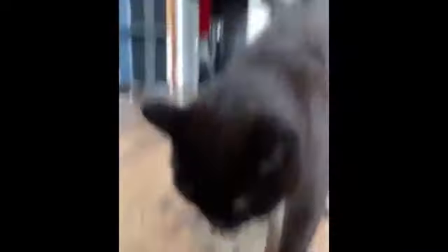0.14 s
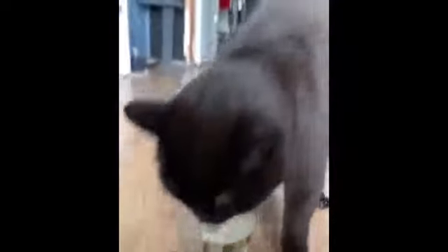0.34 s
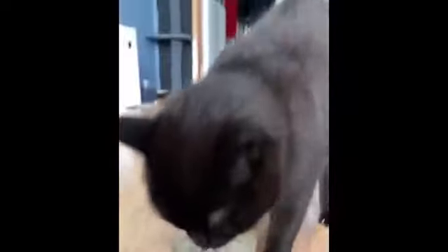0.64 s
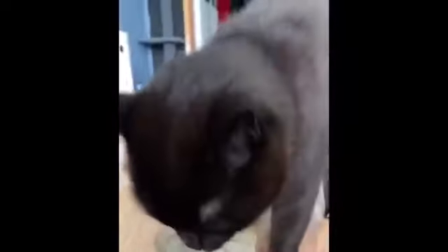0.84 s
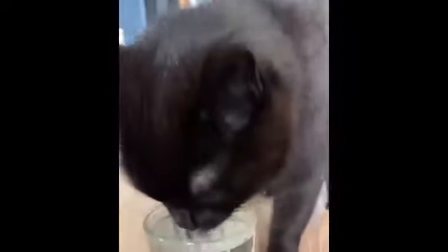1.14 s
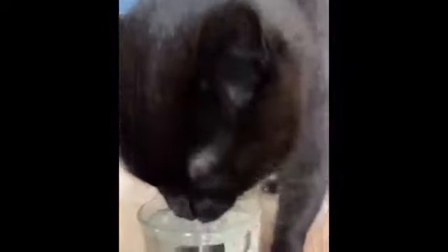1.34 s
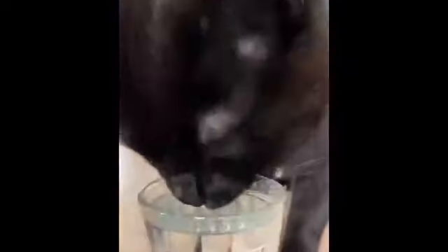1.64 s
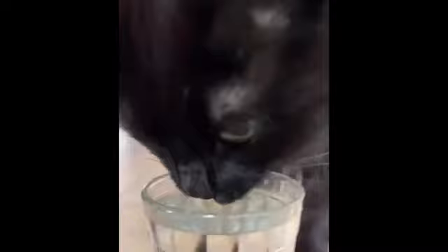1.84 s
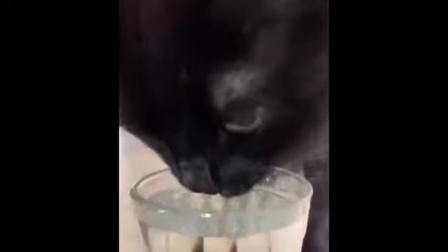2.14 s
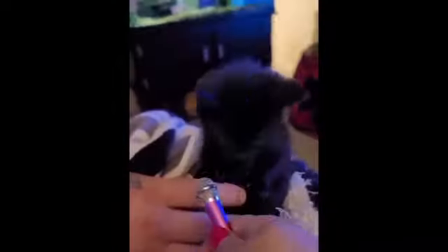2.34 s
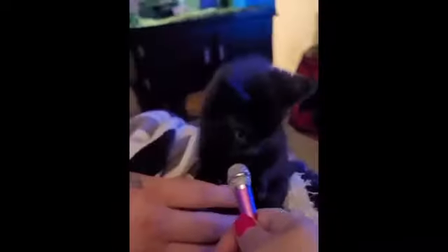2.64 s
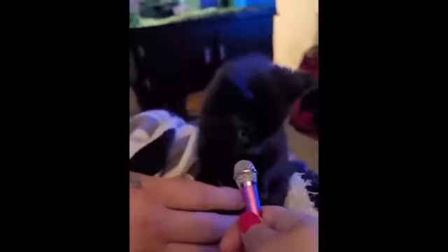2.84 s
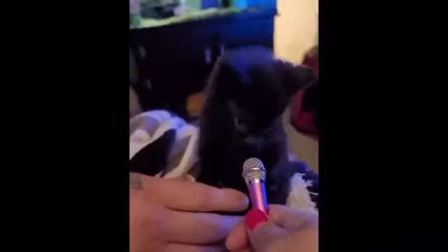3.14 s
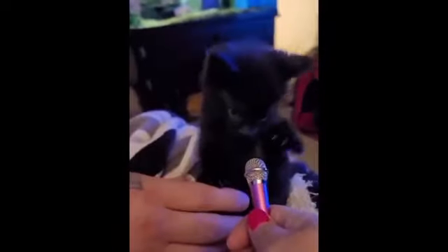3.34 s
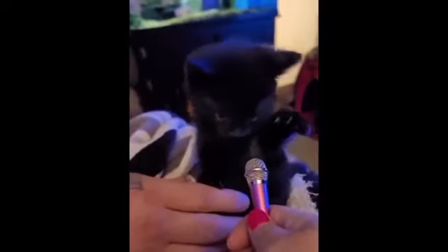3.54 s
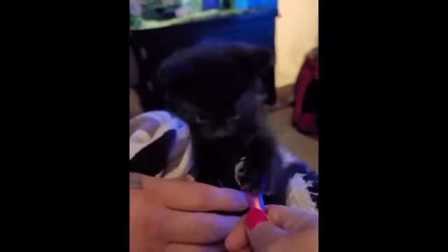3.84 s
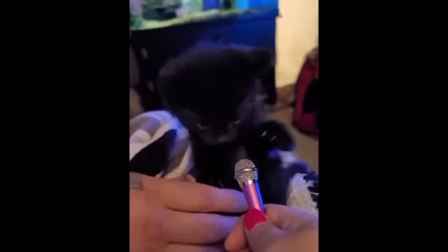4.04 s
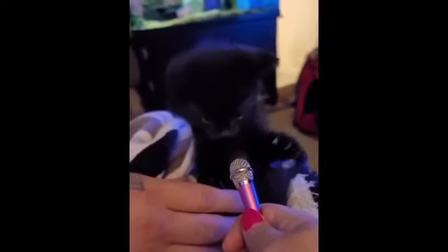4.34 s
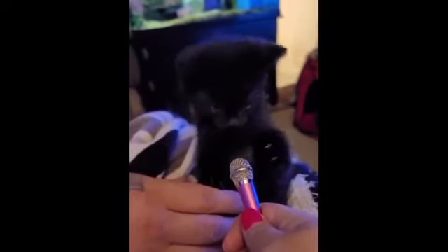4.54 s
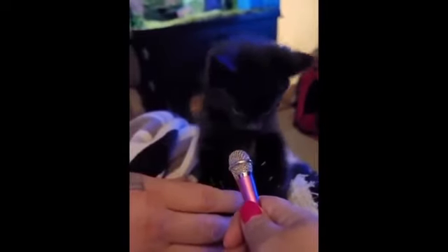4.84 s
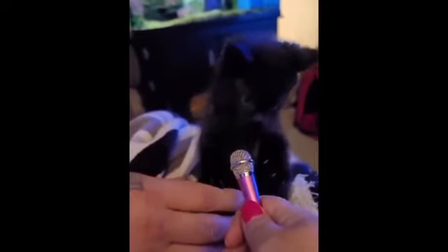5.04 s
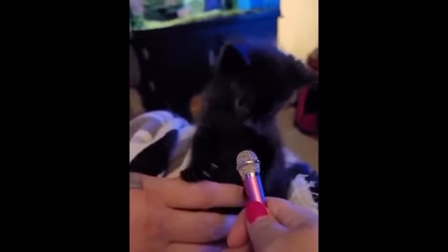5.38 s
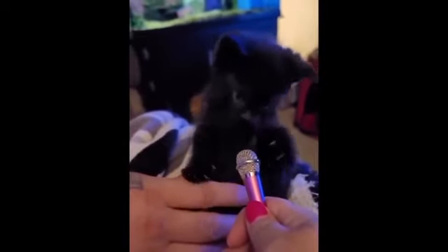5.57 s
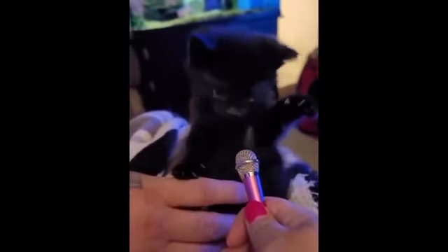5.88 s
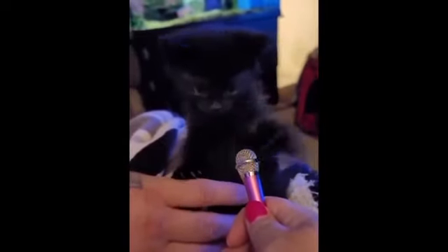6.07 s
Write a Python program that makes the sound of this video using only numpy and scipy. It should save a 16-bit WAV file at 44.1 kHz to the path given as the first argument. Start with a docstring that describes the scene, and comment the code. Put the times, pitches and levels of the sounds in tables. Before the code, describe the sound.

Indoors with a hard floor, hollow water pops and faint wet ticks come from a cat drinking, its breath hissing through the nose against motor hum that swells slightly. The sound cuts to brief silence, then a hushed room with low mains hum. Against the microphone come grainy fur rustles, whisker snaps, bassy paw bumps, a fluttering low purr, and a hard clatter of claws.

```python
"""Cat at a glass, kitten at a microphone

Close at a glass in a room of humming appliances, a cat laps: ringing air pockets click, nose noise puffs.
After a short silence, in a quieter room, a kitten plays with a tiny hand-held microphone:
noise and small flicks ring the grille as fur, soft pushes thump the capsule as paws, claws tick on
the mesh, and a soft purr is a train of throat pulses ringing chest and throat. Both ears hear the same."""
import sys
import numpy as np
from scipy import signal
from scipy.fft import rfft, irfft, next_fast_len
from scipy.io import wavfile
from scipy.ndimage import uniform_filter1d

SR = 44100
rng = np.random.default_rng(int(sys.argv[2]) if len(sys.argv) > 2 else 0)


def to_wav(s):
    """Save 16-bit WAV."""
    ch = np.atleast_2d(s).T  # columns
    pcm = np.round(np.clip(ch, -1, 1) * 32767)  # PCM
    wavfile.write(sys.argv[1], SR, pcm.astype(np.int16))


N = 273861
TIME = np.arange(N) / SR
HIT_TIME = np.arange(SR // 5) / SR  # time within one short sound, s


# tongue slapping the water: start_s, peak_db (of the lowest mode), crackle_s, pitch_hz, tilt_db_per_octave
SLAPS = [(1.4395, -18, .005, 1350, -5), (1.69, -22, .007, 1050, -1), (1.7189, -10, 0.001, 1240, 2)]
# hollow between tongue, water and glass: pitch_ratio, sharpness_q, level_db (before the tilt)
HOLLOW = [(1, 2.5, 0), (1.9, 3, -10), (2.8, 3, -10)]
# air pockets popping as the tongue lifts: start_s, peak_db, pitch_hz, crackle_s, sharpness_q
POCKETS = [(.267, -35.5, 3870, 0.0033, 8), (.302, -23, 2230, 0.011, 8), (.323, -26, 2140, 0.016, 5.5),
           (.361, -27.5, 2100, 0.017, 5.5), (0.451, -28.5, 2620, 0.0032, 5.9),
           (.485, -29, 2190, 0.016, 3.3), (.596, -29.5, 1670, 0.0078, 12), (.667, -37, 4070, 0.0054, 8),
           (0.773, -27.5, 2600, 0.008, 2.7), (0.909, -21, 2800, 0.0046, 6.2),
           (.965, -30, 2970, 0.0065, 2.8), (1.056, -40.5, 6000, .003, 9), (1.072, -29.5, 2680, .004, 16),
           (1.127, -36, 6260, .003, 9.3), (1.162, -33, 2770, .006, 2.7), (1.269, -35, 2900, .004, 7),
           (1.396, -29.5, 5330, .003, 12), (1.517, -31.5, 2930, 0.0077, 7), (1.593, -34.5, 2630, .008, 5.9),
           (1.78, -26.5, 3030, .0019, 4.3), (1.859, -32, 2420, .005, 7), (1.9397, -19.5, 2700, 0.0028, 3.1),
           (1.947, -26.5, 2400, 0.0049, 2.3), (1.955, -19.5, 3050, .004, 6.2)]
# faint wet ticks between them, at random around one size and pitch
TICKS_PER_S = 22
TICK_DB, TICK_SPREAD_DB, TICK_DB_PER_OCTAVE = -35, 1, -5
TICK_HZ, TICK_SPREAD_OCTAVES = 2400, 0.25
TICK_LENGTH_S, TICK_Q = 0.004, 5
# droplets thrown by each slap
DROPLET_COUNT, DROPLET_DELAY_S = 4, 0.012
DROPLET_DB, DROPLET_HZ, DROPLET_SPREAD_OCTAVES = -33, 2500, 0.45
FIRST_END_S = 2.168


def lapping():
    """Tongue slaps ring the hollow under it and throw droplets; air pockets pop, with faint ticks between."""
    out = np.zeros(N)
    for s, db, length, hz, tilt_db in SLAPS:
        for ratio, q, mode_db in HOLLOW:
            level_db = db + mode_db + tilt_db * np.log2(ratio)
            add(out, s, pocket(level_db, hz * ratio, length, q))
        for delay, size, pitch in rng.standard_normal((DROPLET_COUNT, 3)):
            drop_hz = DROPLET_HZ * 2 ** (DROPLET_SPREAD_OCTAVES * pitch)
            drop = pocket(DROPLET_DB + 2 * size, drop_hz, TICK_LENGTH_S, TICK_Q)
            add(out, s + length + DROPLET_DELAY_S * abs(delay), drop)

    for s, db, hz, length, q in POCKETS:
        add(out, s, pocket(db, hz, length, q))

    for k in range(int(FIRST_END_S * TICKS_PER_S)):
        size, pitch = rng.standard_normal(2)
        octaves = TICK_SPREAD_OCTAVES * pitch
        tick_db = TICK_DB + TICK_SPREAD_DB * size + TICK_DB_PER_OCTAVE * octaves
        tick = pocket(tick_db, TICK_HZ * 2 ** octaves, TICK_LENGTH_S, TICK_Q)
        add(out, (k + rng.random()) / TICKS_PER_S, tick)

    # the hard floor and walls return a short tail, falling 60 dB in 0.36 s
    tail = unit(rng.standard_normal(len(HIT_TIME)) * undb(-60 * HIT_TIME / 0.36))
    tail = tail / np.sqrt(len(tail))
    return out + undb(-11.0) * signal.fftconvolve(out, tail)[:N]


def pocket(db, hz, length, q):
    """A small air pocket pops, and the wet crackle after it rings the same cavity."""
    t = HIT_TIME
    ring_s = q / (2 * hz)
    onset = (1 - np.exp(-t / (0.18 * length))) ** 2
    pop = np.sin(2 * np.pi * hz * t) * np.exp(-t / ring_s) * onset
    wet = crackle(len(t), spread_db=2.0) * np.sqrt(t) * np.exp(-(t / length) ** 2 / 2)
    wet = resonate(resonate(wet, hz, q), hz, q / 2)
    return peak(peak(pop, 0) + peak(wet, 0), db)


# puffs through the cat's nose: crest_s, level_db, half_width_s (to 1/e of the power)
PUFFS = [(.15, -44, 0.11), (.585, -39.5, 0.081), (1.31, -49, 0.088), (1.72, -37.5, 0.064),
         (2.06, -42.5, 0.057)]
# hiss of the nose: pitch_hz, density_db (per Hz, relative)
NOSE_COLOUR = [(500, -4.5), (1500, 0.5), (3000, 3), (4500, -0.5), (6200, 0), (8500, -4), (10500, -8),
               (12000, -23)]
NOSE_STEADY_DB = -51  # the flow between puffs


def nose():
    """Turbulent breath hisses over the glass in short puffs, each swelling and fading evenly."""
    power = undb(NOSE_STEADY_DB) ** 2
    for s, db, width in PUFFS:
        power = power + undb(db) ** 2 * np.exp(-((TIME - s) / width) ** 2)
    hiss = colour(rng.standard_normal(N), NOSE_COLOUR)
    return hiss * np.sqrt(power) * undb(1.0 * walk(30.07))


# strokes of fur over the grille: start_s, length_s, level_db (before grip and hairs)
STROKES = [(2.488, 0.076, -54.5), (2.774, 0.023, -36.5), (2.823, 0.008, -44), (2.923, 0.082, -45),
           (3.256, 0.043, -43.5), (3.341, 0.025, -44.5), (3.371, 0.13, -42.5), (3.668, 0.012, -49.5),
           (3.772, 0.014, -57)]
STROKE_ATTACK_S, STROKE_RELEASE_S = 0.0086, 0.04
STROKE_CATCH_DB, STROKE_CATCH_S = -21, 0.0058  # extra pressure as hairs catch, then slide
# whiskers catching on the mesh: start_s, scrape_db (before the ring and rustle shares), length_s, snap_peak_db
SCRAPES = [(2.7765, -39, 0.014, -33), (2.8007, -34, .0035, -20), (2.809, -39, 0.0068, -28),
           (2.834, -34, 0.012, -21), (2.921, -40, 0.005, -27), (2.942, -48, .004, -34),
           (2.957, -48, .005, -34), (3.252, -34, 0.012, -26), (3.285, -38, .007, -29),
           (3.34, -37.5, 0.0061, -28), (3.371, -44, .007, -35), (3.463, -40, 0.0049, -27),
           (3.51, -35, 0.0045, -24)]
# rustle of fur: pitch_hz, density_db (per Hz, relative)
FUR_COLOUR = [(350, 12), (600, -1.5), (800, -12), (1300, -7), (1900, -12), (2400, 0.5), (3500, -0.5),
              (5000, -7), (6400, -8), (7500, -6), (10000, -12.5), (12000, -28)]
# resonances of the grille, each set off by its own hairs: pitch_hz, sharpness_q, level_db (relative)
GRILLE = [(723, 5, 5), (988, 11, 7), (1247, 19, 5.5), (1550, 7.9, 5), (1917, 20, 4), (2950, 2.1, -1),
          (4180, 6.1, -1), (5700, 6.8, 3), (6400, 50, -1.5)]
WHISKER_RING_DB, WHISKER_RUSTLE_DB = -6.5, -15  # a stiff whisker rings the grille more than it rustles
# single hairs flicking off the wire; their level is relative to the rustle
HAIRS_PER_S, HAIR_SPREAD_DB, HAIR_MODE_SPREAD_DB, HAIR_DB = 300, 4, 3, 2


def fur():
    """Hairs slip over the grille in a grainy rustle; now and then a whisker catches, snaps free and scrapes."""
    pressure, catches, snaps = np.zeros(N), np.zeros(N), np.zeros(N)
    for s, length, db in STROKES:
        add(pressure, s, undb(db) * stroke(length))

    flick = np.exp(-HIT_TIME / 0.00018)
    ping = sum(undb(db) * resonate(flick, hz, q) for hz, q, db in GRILLE)
    for s, db, length, snap_db in SCRAPES:
        add(catches, s, undb(db) * np.exp(-HIT_TIME / length))
        add(snaps, s, peak(ping, snap_db))

    rustle = colour(crackle(N, spread_db=3.0), FUR_COLOUR)
    rings = np.zeros(N)
    for hz, q, db in GRILLE:
        # the force jumps every 150 samples as hairs slip
        slips = undb(4.5 * np.repeat(rng.standard_normal(N // 150 + 1), 150)[:N])
        driven = resonate(crackle(N, spread_db=5.0) * slips, hz, q)
        rings += undb(db) * unit(resonate(driven, hz, q=2.2))
    rings = unit(rings)

    grip_db = 2 * np.interp(TIME * 140, np.arange(1024), rng.standard_normal(1024))
    grip = unit(undb(grip_db))
    texture = unit(unit(rustle + rings) + undb(HAIR_DB) * hairs())
    sliding = pressure * grip * texture
    scraping = catches * (undb(WHISKER_RING_DB) * rings + undb(WHISKER_RUSTLE_DB) * rustle)
    return sliding + snaps + scraping


def stroke(length):
    """Pressure of one stroke: the hairs catch, slide on and lift off."""
    t = TIME[:SR // 2]
    attack = np.minimum(t / STROKE_ATTACK_S, 1)
    catch = 1 + undb(STROKE_CATCH_DB) * np.exp(-t / STROKE_CATCH_S)
    lift = np.exp(-np.maximum(t - length, 0) / STROKE_RELEASE_S)
    return attack * catch * lift


def hairs():
    """Single hairs flick off the wire, each ringing the grille in its own way."""
    count = int(N / SR * HAIRS_PER_S)
    at = rng.integers(0, N, count)
    size_db = HAIR_SPREAD_DB * np.clip(rng.standard_normal(count), -2, 2)
    out = np.zeros(N)
    for hz, q, db in GRILLE:
        strength = undb(size_db + HAIR_MODE_SPREAD_DB * rng.standard_normal(count))
        flicks = np.bincount(at, strength * rng.choice([-1, 1], count), N)
        out += undb(db) * unit(resonate(resonate(flicks, hz, q), hz, q=2.3))
    return unit(out)


# paw blows on the microphone: start_s, peak_db, contact_s (time scale of the push), swing_hz
PAWS = [(2.838, -33, 0.0011, 85), (3.653, -2.5, 0.00052, 77.4), (3.785, -26.5, 0.00062, 80),
        (4.618, -15, 0.00051, 86), (4.652, -17, 0.00048, 90), (5.94, -4, 0.0011, 70)]
BODY_HZ, BODY_Q, BODY_DB = 784, 6.2, -12.5  # the microphone's housing knocks under a blow


def paws():
    """A soft pad pushes the capsule; the microphone's bass cut swings it back in a thump, the housing knocks."""
    push = np.zeros(N)
    t = HIT_TIME - 0.01  # the push crests at zero
    for s, db, contact, hz in PAWS:
        pad = 1 / np.cosh(np.clip(t / contact * 0.89, -50, 50))
        swing = resonate(resonate(pad, hz, q=1.26, kind="high"), 48, q=1.0, kind="high")
        knock = undb(BODY_DB) * BODY_Q * resonate(pad, BODY_HZ, BODY_Q)
        add(push, s + t[0], peak(swing + knock, db))
    return -push


# claws on the mesh: start_s, peak_db, mesh_share (0-1)
CLAWS = [(4.6173, -21, 0.01), (4.6527, -28, 0.01), (5.935, -23, 0.8), (5.9401, -2.5, 0.3),
         (5.9429, -11, 0.7), (5.953, -14, 0.4), (5.956, -19, 0.2), (5.9596, -9.5, 0.17), (5.962, -14.5, 0),
         (5.969, -18.5, 0)]


def claws():
    """A claw gives a hard, gritty tick; the wire mesh rings briefly and sizzles on."""
    out, t = np.zeros(N), HIT_TIME
    for s, db, mesh_share in CLAWS:
        tick = resonate(np.exp(-t / 0.001), 4600, q=1.0, kind="low")
        grit = resonate(rng.standard_normal(len(t)), 4600, q=1.0, kind="low") * np.exp(-t / 0.005)
        mesh_hz = 6400 * (1 + 0.0082 * rng.standard_normal())
        mesh = np.sin(2 * np.pi * mesh_hz * t) * undb(-60 * t / 0.012)
        sizzle = resonate(rng.standard_normal(len(t)), 7100, q=3) * undb(-60 * t / 0.13)
        ringing = mesh_share * (peak(mesh, 2.0) + peak(sizzle, -10.0))
        add(out, s, peak(-peak(tick, 0) + peak(grit, -12.5) + ringing, db))
    return out


# pace of the purr: time_s, rate_hz (cycles per second)
PURR_RATE = [(4.9, 26), (5.24, 26.3), (5.29, 24.6), (5.375, 23.1), (5.455, 29), (5.52, 27.2), (5.56, 23.7),
             (5.645, 22.4), (5.71, 27.3), (5.87, 27.6), (5.95, 25.6), (6.04, 27.5), (6.12, 22.3)]
# effort of the purr: time_s, gain_db
PURR_EFFORT = [(5.15, -5), (5.23, 0), (5.31, 3), (5.36, -2), (5.43, 2.5), (5.5, -7), (5.59, 1), (5.63, 0),
               (5.67, -4.5), (5.77, -3.5), (5.88, 2), (6.01, 3), (6.08, 2), (6.12, -6)]
# the kitten's throat and chest: pitch_hz, sharpness_q, gain_db
THROAT = [(322, 3.5, 5), (990, 1.16, -5.5), (1400, 2.8, -15)]
CHEST = [(110, 4.7, 4.6), (213, 1.8, 1.7)]
PURR_START_S, PURR_OPENS_S = 4.95, 5.232  # it sets in softly, then the throat opens
PURR_JITTER_S, PURR_SCATTER_DB = 0.0005, 1.2
PURR_DB, THROAT_OPEN_DB, THROAT_NARROW_DB = -20, -1, -11  # gains
CLOSING_SHARE, CLOSING_DB = 0.66, -8  # part of the cycle before it shuts; gain of the shutting pulse


def purr():
    """The larynx snaps open and shut in uneven cycles; pulses ring chest and throat, each with a small puff."""
    pulses = np.zeros(N)
    snap = -resonate(np.exp(-HIT_TIME / 0.00039), 1350, q=0.55, kind="low")
    cycles = np.cumsum(curve(PURR_RATE)) / SR
    cycles -= np.interp(PURR_OPENS_S, TIME, cycles)
    new_cycle = np.diff(np.floor(cycles)) > 0
    starts = TIME[1:][new_cycle & (TIME[1:] > PURR_START_S)]
    for s, (late, opening, closing) in zip(starts, rng.standard_normal((len(starts), 3))):
        s = s + PURR_JITTER_S * late
        shuts = s + CLOSING_SHARE / np.interp(s, *np.transpose(PURR_RATE))
        add(pulses, min(s, TIME[-1]), snap * undb(PURR_SCATTER_DB * opening))
        add(pulses, min(shuts, TIME[-1]), snap * undb(CLOSING_DB + PURR_SCATTER_DB * closing))
    pulses = pulses * undb(PURR_DB + curve(PURR_EFFORT))

    air = resonate(rng.standard_normal(N), 990, q=1.0, kind="low")
    puff_flow = signal.fftconvolve(pulses, np.exp(-HIT_TIME / 0.012))[:N]
    puffs = undb(-38) * air * puff_flow
    is_open = cycles > -0.25
    airflow = (pulses + puffs) * undb(np.where(is_open, THROAT_OPEN_DB, THROAT_NARROW_DB))
    throat = sum(undb(gain_db) * resonate(airflow, hz, q) for hz, q, gain_db in THROAT)
    chest = sum(undb(gain_db) * resonate(pulses, hz, q) for hz, q, gain_db in CHEST)
    # the closed mouth muffles it
    return resonate(throat + chest, 1180, q=1.05, kind="low")


# appliance tones of the first room:
# pitch_hz, level_db (rms at the start), growth_db_per_s (some tones swell, others sink)
MOTOR_TONES = [(64.3, -40, -2), (99.2, -39.5, 0.5), (123.4, -39, 0.5), (167.2, -42, 2.5),
               (255.7, -45.5, -1), (304, -53, 5.5), (480.4, -49.5, 4.5), (583, -41, -4), (813, -62.5, 5),
               (1090, -64.5, 7.5)]
# low rumble and rush of the fans: pitch_hz, density_db (per Hz, relative)
RUMBLE_COLOUR = [(13, -39.5), (22, -25), (59, 6.5), (91, -14.5), (113, -4.5), (167, -2.5), (234, -6),
                 (481, -8.5), (500, -10.5), (650, -32.5), (1100, -120)]
AIR_COLOUR = [(200, -16.5), (400, 7), (700, 6.5), (1200, 0), (2000, -2), (2900, -9.5), (4000, -14),
              (7000, -35.5), (12000, -47.5)]
# the fans, heard by way of the glass, grow louder as the listener moves in towards it
RUMBLE_DB, FANS_DB, FANS_GROWTH_DB_PER_S = -31.5, -38.5, 1.9


def humming_room():
    """Motors hum as wavering tones over a low noise rumble and the rush of their fans."""
    rumble = colour(rng.standard_normal(N), RUMBLE_COLOUR) * undb(RUMBLE_DB + 1.9 * walk(9.29))
    fans_db = FANS_DB + FANS_GROWTH_DB_PER_S * TIME + 0.96 * walk(21.92)
    air = colour(crackle(N, spread_db=4.0), AIR_COLOUR) * undb(fans_db)
    motors = hum(MOTOR_TONES, waver_db=3, wavers_per_s=14, drift_hz=3.5, drifts_per_s=22)
    return rumble + reflect(air) + motors


# reflections off the water, the glass and the floor: delay_s, gain (linear)
REFLECTIONS = [(.0041, 0.045), (.0093, 0.23)]
# the air in the glass: pitch_hz, sharpness_q, gain_db
GLASS = [(1290, 14, -4.5), (1670, 11, -20), (2170, 66, -16.5), (2710, 20, -1.5), (4500, 33, -15.5),
         (4960, 40, -5.5)]


def reflect(x):
    """Nearby hard surfaces comb the sound, and the air in the glass rings along."""
    out = x + sum(undb(db) * resonate(x, hz, q) for hz, q, db in GLASS)
    for delay, gain in REFLECTIONS:
        add(out, delay, gain * x)
    return out


# mains and motor hum of the second room: pitch_hz, level_db (rms, before the gain below), growth_db_per_s
MAINS_TONES = [(59.7, -46, 0.013), (105.2, -55.5, 0), (118.4, -40.5, 0), (183.5, -50, 0), (239.7, -55, 0)]
# gain of that hum: time_s, gain_db
HUM_LEVEL = [(2.4, -1), (2.85, 2.5), (3.3, -0.5), (4.25, 0), (4.5, -3.5), (4.75, 2), (5.2, 3), (5.35, -1),
             (5.85, 3.5), (6.2, 4)]
# its rumble and hiss: pitch_hz, density_db (per Hz, relative)
QUIET_COLOUR = [(22, -17), (45, -4), (68, -7.5), (87, -1), (125, -10), (160, -9.5), (230, -9), (330, -18),
                (600, -26), (760, -24.5), (1100, -34.5), (1900, -33), (2600, -36.5), (3300, -33.5),
                (6200, -34.5), (7300, -42), (11500, -47)]
# gain of the treble of the hiss: time_s, gain_db
HISS_LEVEL = [(3.65, 0), (3.85, -2.5), (3.97, -5), (4.1, -.5), (4.35, -2), (4.7, 0), (5.3, 0), (5.48, -2.5),
              (5.9, -1.5)]
HISS_ABOVE_HZ = 900


def quiet_room():
    """Wavering mains hum, and noise split into a low rumble and a soft hiss that sinks and returns."""
    noise = colour(rng.standard_normal(N), QUIET_COLOUR) * undb(-41.5 + 0.7 * walk(5))
    low = signal.sosfiltfilt(signal.butter(2, HISS_ABOVE_HZ, fs=SR, output="sos"), noise)
    hiss = (noise - low) * undb(curve(HISS_LEVEL))
    mains = hum(MAINS_TONES, waver_db=1.6, wavers_per_s=30, drift_hz=3, drifts_per_s=30)
    return low + hiss + mains * undb(curve(HUM_LEVEL))


def hum(tones, waver_db, wavers_per_s, drift_hz, drifts_per_s):
    """Sustained sine tones that waver in level and pitch."""
    out = np.zeros(N)
    for hz, db, growth in tones:
        turns = np.cumsum(hz + drift_hz * walk(drifts_per_s)) / SR + rng.random()
        level = undb(db + growth * TIME + waver_db * walk(wavers_per_s))
        out += np.sqrt(2) * level * np.sin(2 * np.pi * turns)
    return out


def crackle(size, spread_db):
    """Dense tiny clicks of very unequal strength; rms 1."""
    return unit(rng.standard_normal(size) * undb(spread_db * rng.standard_normal(size)))


def walk(rate):
    """Smooth random drift with an rms of 1, heading for a new value rate times a second."""
    knots = rng.standard_normal(1024)
    path = np.interp(TIME * rate, np.arange(len(knots)), knots)
    return unit(uniform_filter1d(path, SR // 50))


def resonate(x, hz, q, kind="band"):
    """A two-pole resonance, heard as band-, low- or high-pass."""
    g = np.tan(np.pi * min(hz, SR / 2 - 1000) / SR)
    top = {"band": [g / q, 0, -g / q], "low": [g * g, 2 * g * g, g * g], "high": [1, -2, 1]}[kind]
    bottom = [1 + g / q + g * g, 2 * g * g - 2, 1 - g / q + g * g]
    return signal.lfilter(top, bottom, x + 1e-18)


def colour(x, points):
    """Shape a sound's spectrum by (Hz, dB) points, falling 24 dB per octave outside them; rms 1."""
    hz, db = np.transpose(points)
    size = next_fast_len(len(x))
    f = np.maximum(np.arange(size // 2 + 1) * SR / size, 1)
    octaves_outside = np.maximum(np.log2(hz[0] / f), 0) + np.maximum(np.log2(f / hz[-1]), 0)
    gain = undb(np.interp(np.log(f), np.log(hz), db) - 24 * octaves_outside)
    return unit(irfft(rfft(x, size) * gain, size)[:len(x)])


def curve(rows, axis=1):
    """One column of a table, joined by straight lines in time."""
    rows = np.array(rows)
    return np.interp(TIME, rows[:, 0], rows[:, axis])


def add(out, s, x):
    """Mix a sound in at s seconds."""
    i = int(s * SR)
    out[i:i + len(x)] += x[:N - i]


def undb(db):
    """Decibels to gain."""
    return np.exp(np.asarray(db) * (np.log(10) / 20))


def unit(x):
    """Scale to rms 1."""
    return x / np.sqrt(np.mean(x ** 2))


def peak(x, db):
    """Scale to a peak level."""
    return x * undb(db) / np.abs(x).max()


SECOND_START_S = 2.378


def scene():
    """The drinking cat, a short silence, then the kitten; the same in both ears."""
    first_gate = uniform_filter1d(1.0 * (TIME < FIRST_END_S), size=128)
    drinking = (lapping() + reflect(nose()) + humming_room()) * first_gate
    playing = (fur() + paws() + claws() + purr() + quiet_room()) * (TIME > SECOND_START_S)
    return np.tile(drinking + playing, (2, 1))


TOP_HZ = 11900


def record(dry):
    """The recorder cuts the top with a steep low-pass."""
    return signal.sosfilt(signal.ellip(8, 0.2, 70, TOP_HZ, fs=SR, output="sos"), dry)


dry = scene()
out = record(dry)
to_wav(out)
```